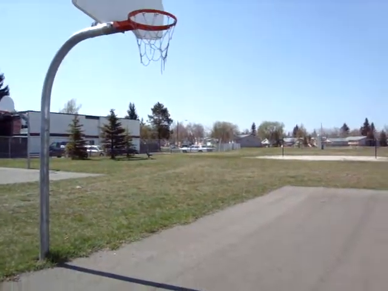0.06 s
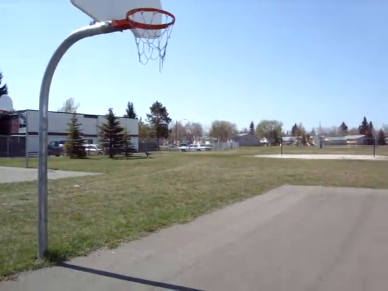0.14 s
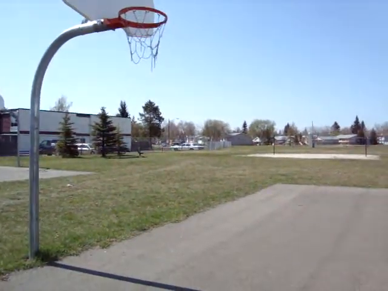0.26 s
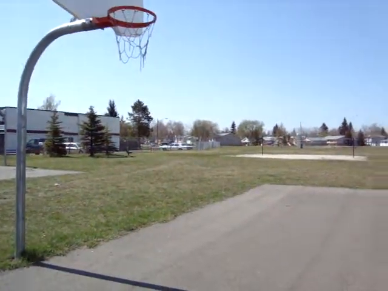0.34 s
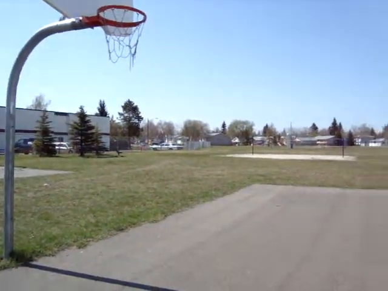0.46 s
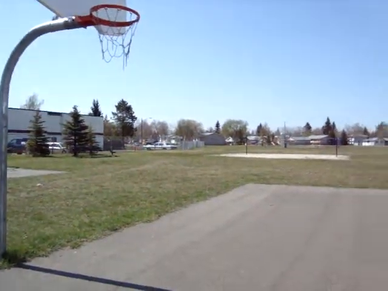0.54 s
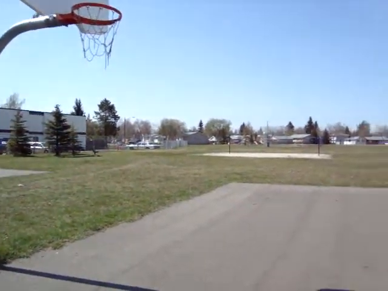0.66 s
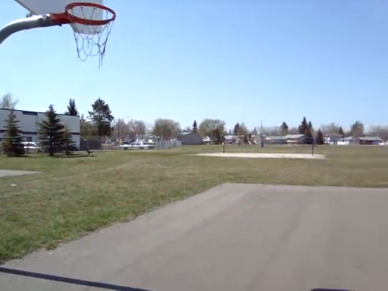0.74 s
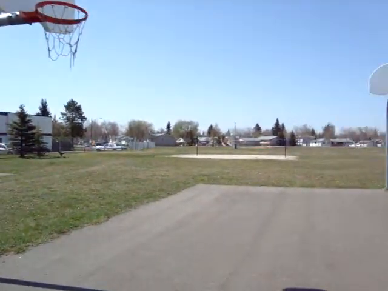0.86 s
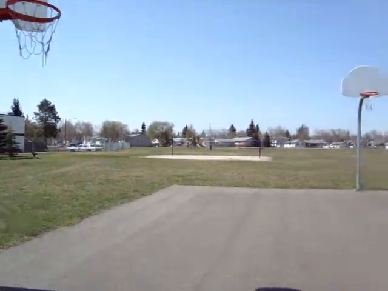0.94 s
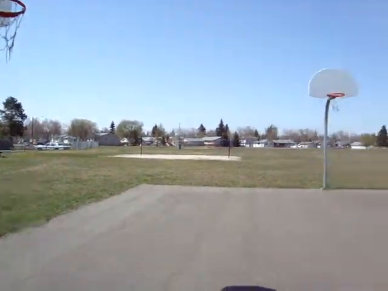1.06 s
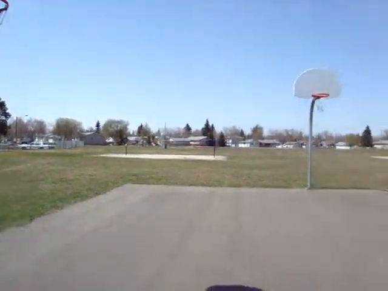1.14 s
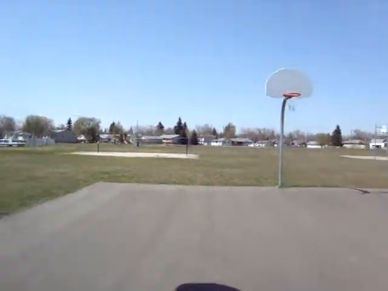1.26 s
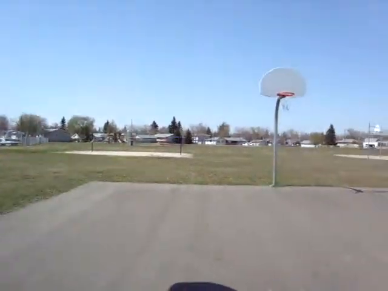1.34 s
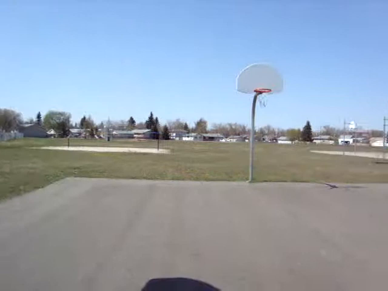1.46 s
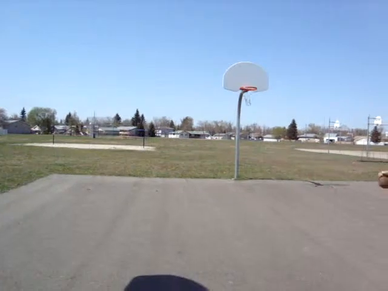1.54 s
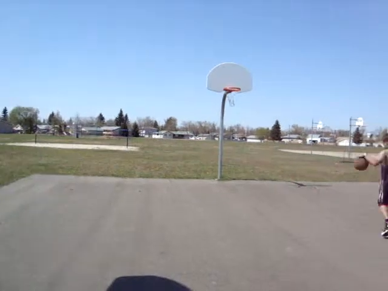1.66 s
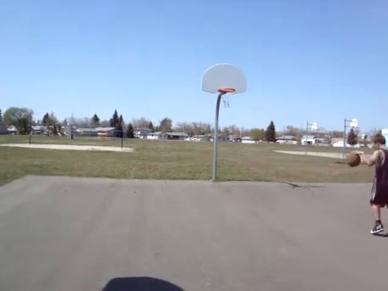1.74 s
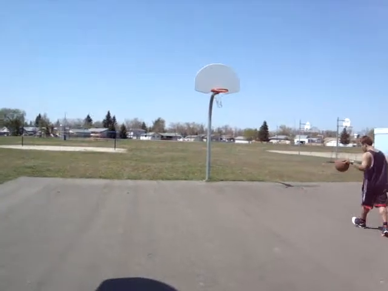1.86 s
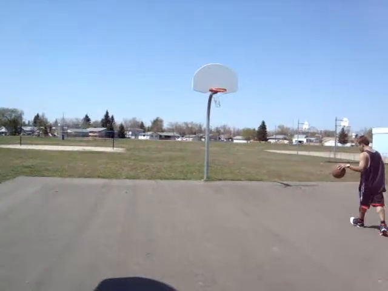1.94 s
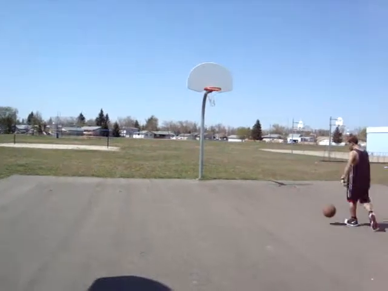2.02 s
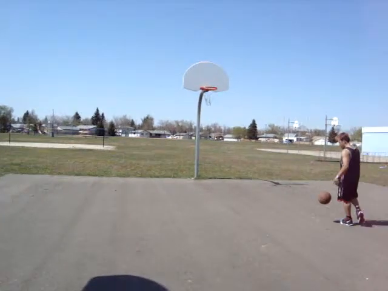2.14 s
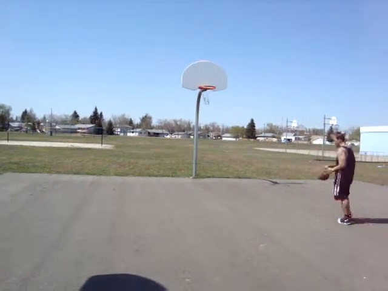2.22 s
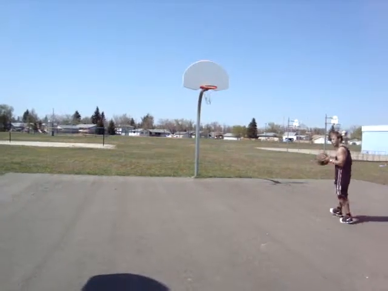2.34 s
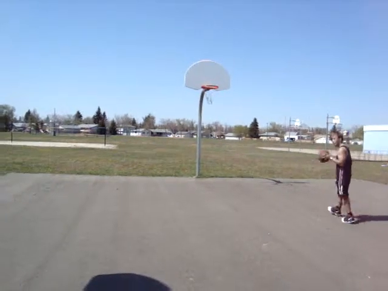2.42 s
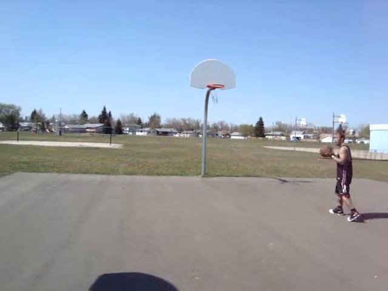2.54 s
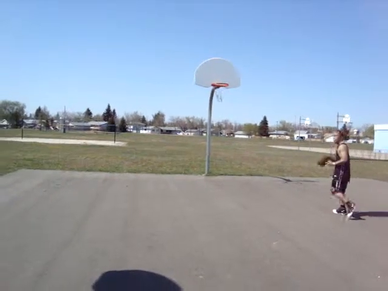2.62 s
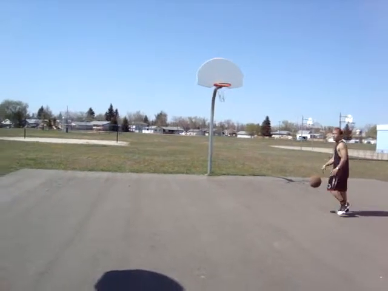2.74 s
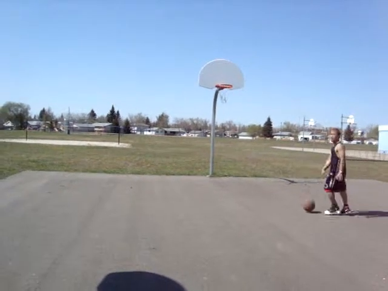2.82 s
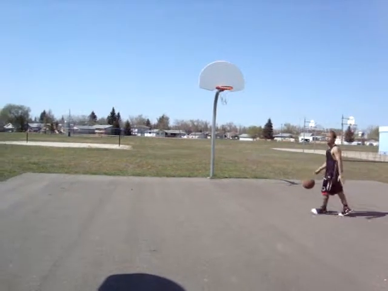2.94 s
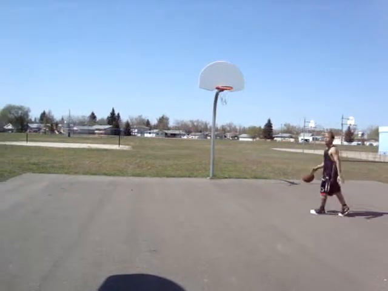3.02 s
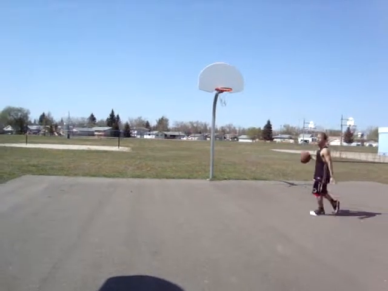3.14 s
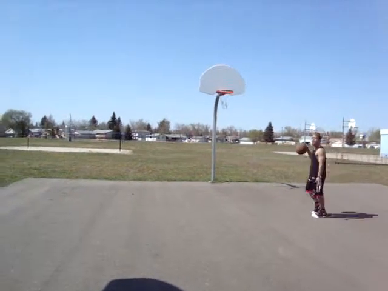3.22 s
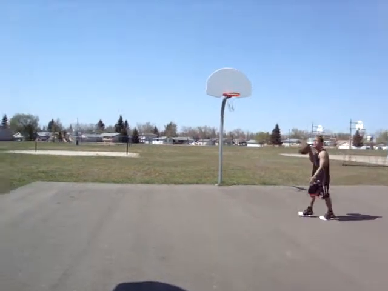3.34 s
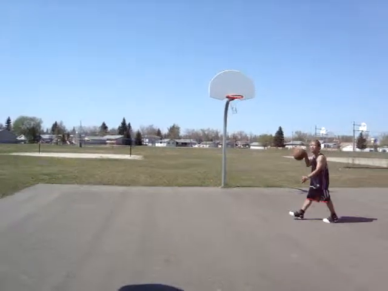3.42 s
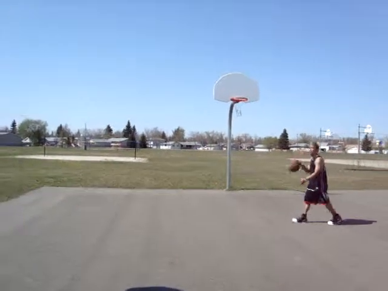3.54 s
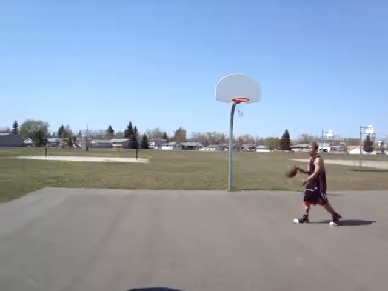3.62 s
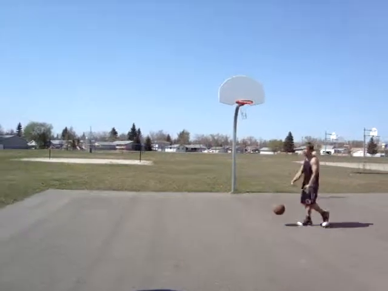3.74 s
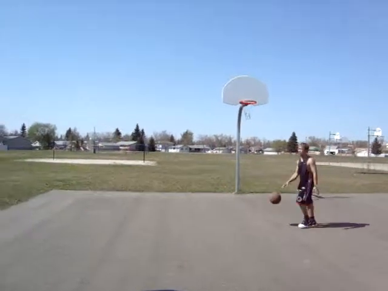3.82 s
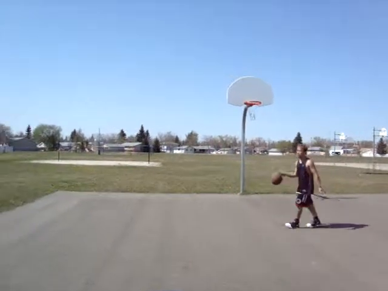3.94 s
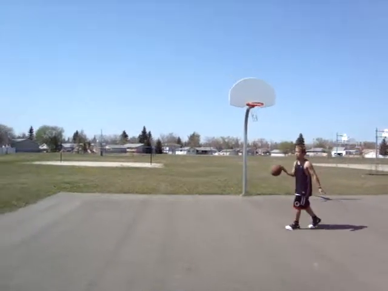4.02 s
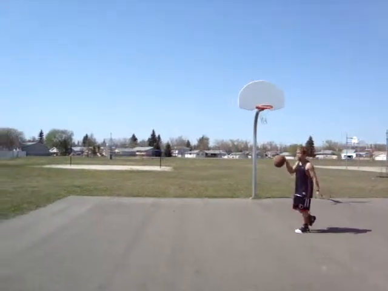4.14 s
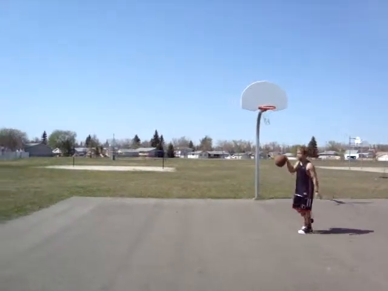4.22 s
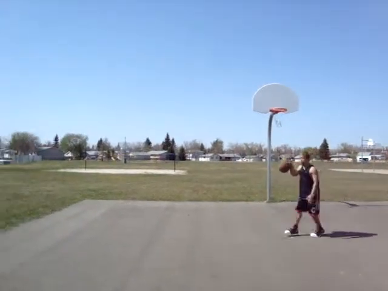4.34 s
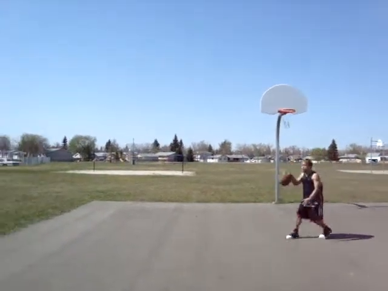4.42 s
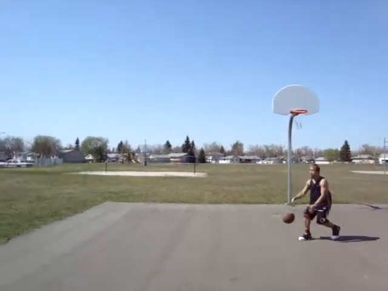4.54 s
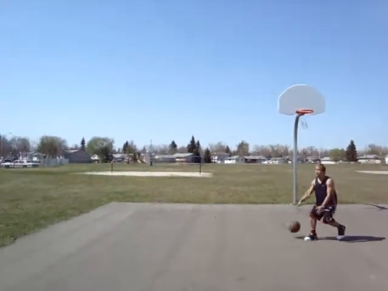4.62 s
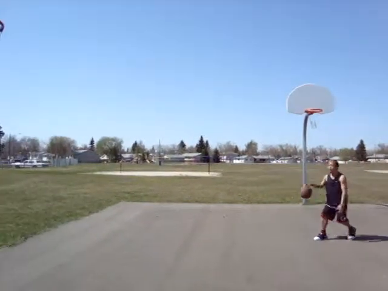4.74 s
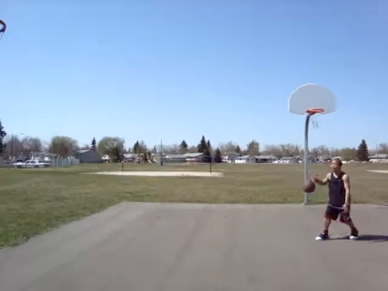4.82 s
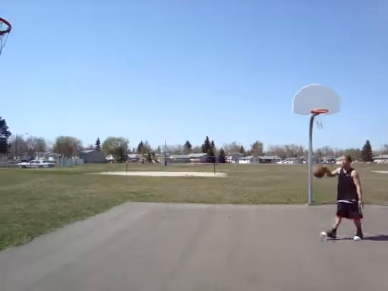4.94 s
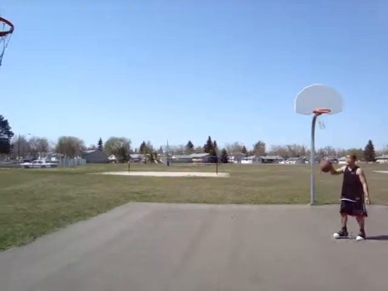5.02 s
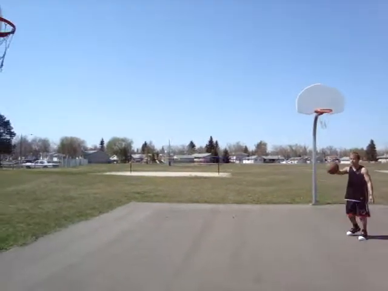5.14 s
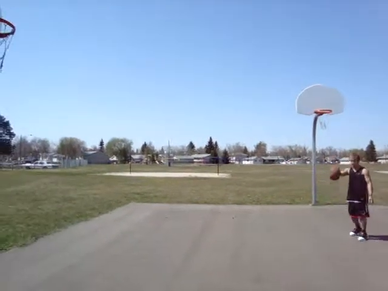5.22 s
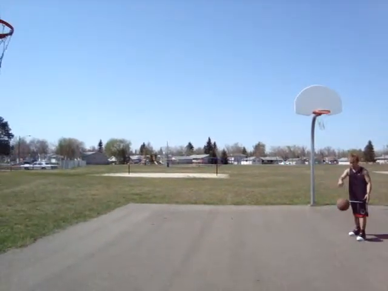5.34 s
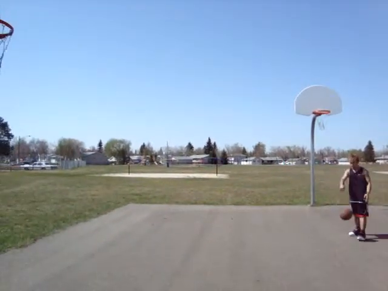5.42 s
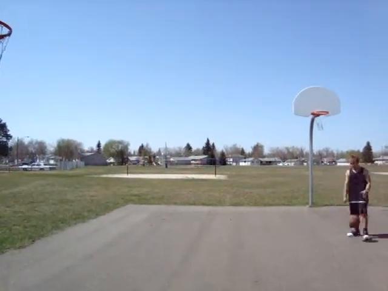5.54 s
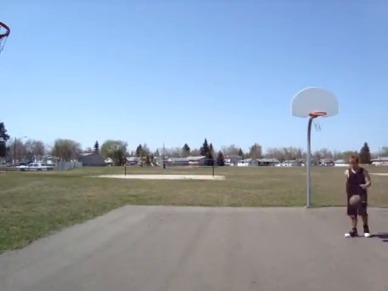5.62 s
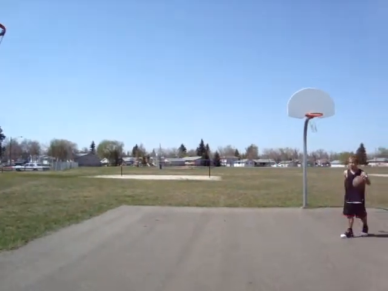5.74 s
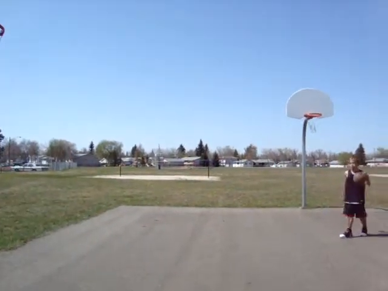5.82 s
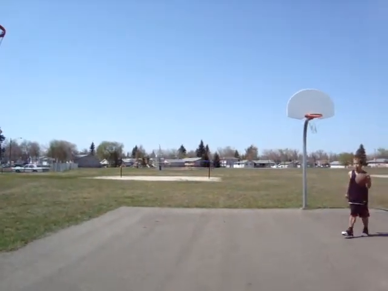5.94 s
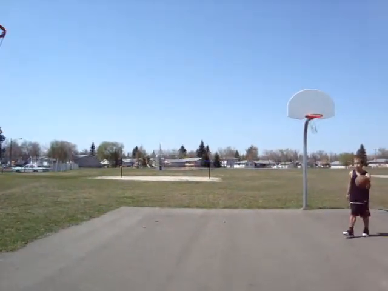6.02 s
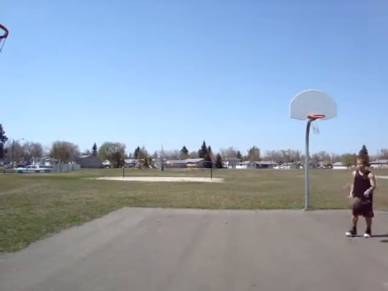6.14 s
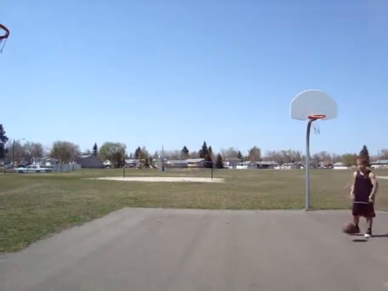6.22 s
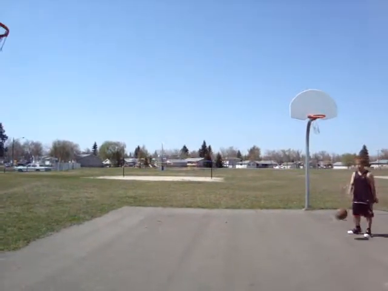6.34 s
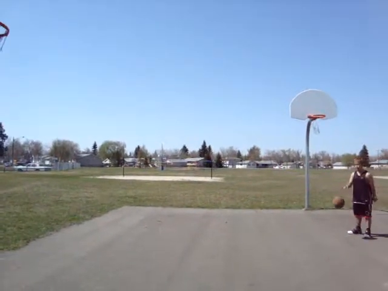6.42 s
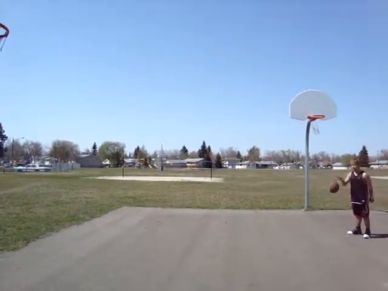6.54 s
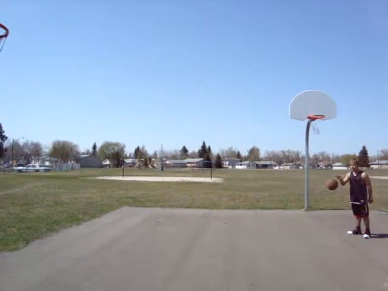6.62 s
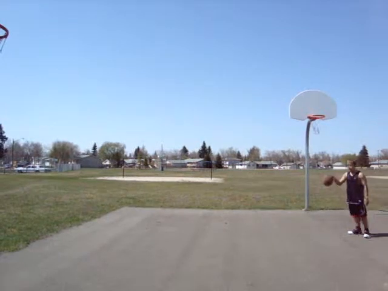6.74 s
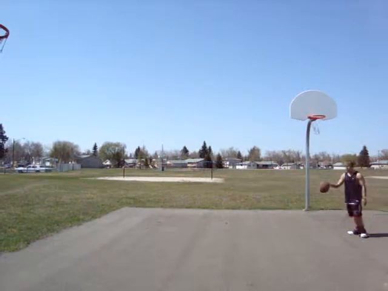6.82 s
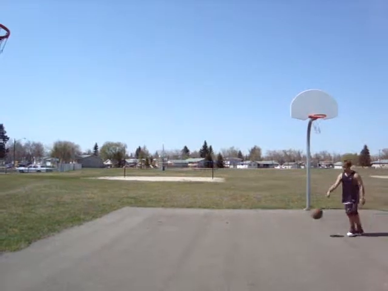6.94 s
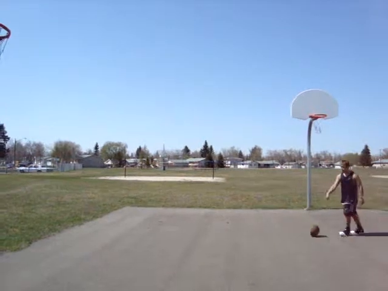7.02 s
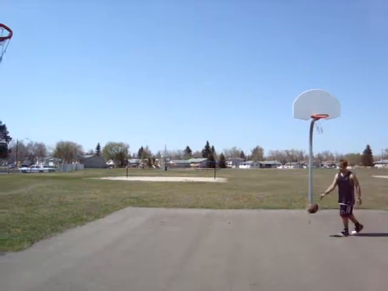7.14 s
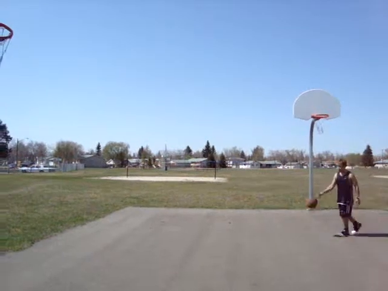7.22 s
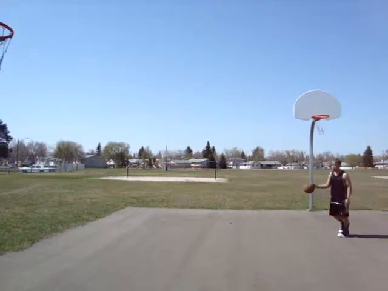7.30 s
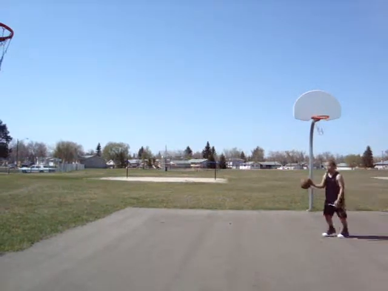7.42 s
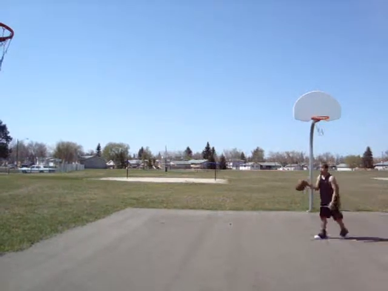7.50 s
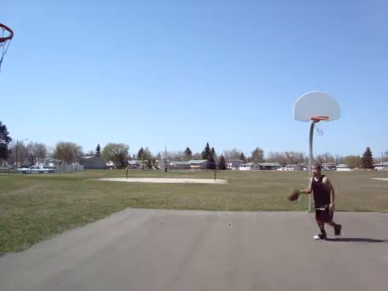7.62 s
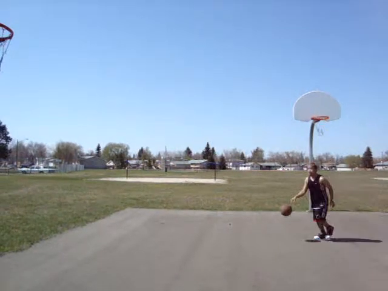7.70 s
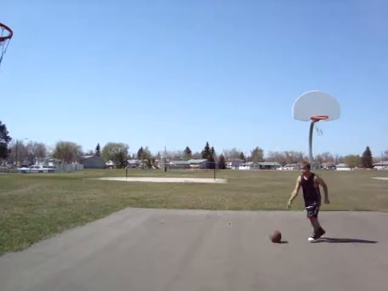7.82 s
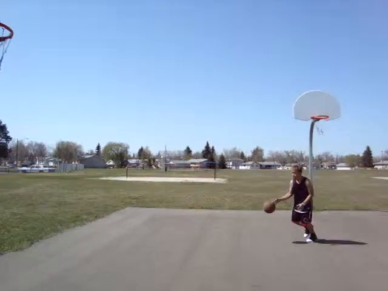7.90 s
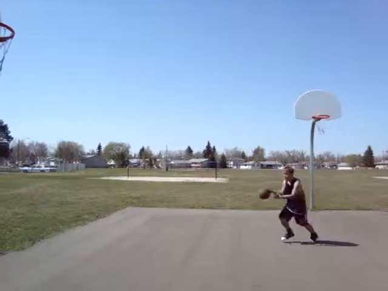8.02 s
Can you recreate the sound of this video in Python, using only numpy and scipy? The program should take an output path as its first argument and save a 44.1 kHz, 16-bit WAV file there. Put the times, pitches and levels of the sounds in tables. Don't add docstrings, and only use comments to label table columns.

```python
import sys
import numpy as np
from scipy import signal
from scipy.fft import rfft, irfft, next_fast_len
from scipy.io import wavfile
from scipy.ndimage import uniform_filter1d, map_coordinates

SR = 44100
rng = np.random.default_rng(int(sys.argv[2]) if len(sys.argv) > 2 else 0)


def volts_from_db(level):
    exponent = np.asarray(level, float) / 20
    return 10 ** exponent


def generate_wav(sig):
    pcm = np.round(np.clip(np.atleast_2d(sig).T, -1, 1) * 32767).astype(np.int16)
    wavfile.write(sys.argv[1], SR, pcm)


N = 355887


def unit(x):
    return x / np.sqrt(np.mean(x ** 2) + 1e-20)


def filtered(x, response):
    m = next_fast_len(len(x) + 4096)
    return irfft(rfft(x, m) * response(np.fft.rfftfreq(m, 1 / SR)), m)[:len(x)]


def noise(spectrum, size):
    f, db = np.transpose(spectrum)
    white = rng.standard_normal(size)
    return unit(filtered(white, lambda hz: volts_from_db(np.interp(np.log(hz + 1), np.log(f), db))))


def wobble(rate, size=N):
    knots = rng.standard_normal(int(size * rate / SR) + 4)
    return map_coordinates(knots, [np.arange(size) * rate / SR])


def add(track, s, sound):
    part = track[round(s * SR):][:len(sound)]
    part += sound[:len(part)]


def decay(t, t60):
    return volts_from_db(-60 * t / t60)


def sine(hz, t):
    return np.sin(2 * np.pi * hz * t)


def ring(modes, t, attack):
    tones = 0
    for hz, db, t60 in modes:
        strength, detune = rng.standard_normal(2)
        tones = tones + volts_from_db(db + 1.1 * strength) * decay(t, t60) * sine(hz * (1 + 0.032 * detune), t)
    return tones * (1 - np.exp(-t / attack))


# t/s, level/dB
WIND_STRENGTH = [(0, -59.5), (1.73, -59), (1.89, -47.5), (2.36, -52.5), (2.79, -56), (3.32, -55.5),
                 (3.84, -59.5), (4.83, -62), (5.19, -59), (5.64, -60.5), (7.46, -57.5), (7.87, -55),
                 (8.07, -57)]
# f/Hz, level/dB per Hz
WIND_RUMBLE = [(12, -69), (20, -35.5), (97, -6.5), (215, -3), (286, -13), (600, -13.5), (780, -38.5),
               (1320, -120)]


def wind():
    lumps = unit(noise(WIND_RUMBLE, N) * volts_from_db(4.0 * wobble(30)))
    return volts_from_db(np.interp(np.arange(N) / SR, *np.transpose(WIND_STRENGTH))) * lumps


# t/s, level/dB
ROAD_LEVEL = [(0, -48.5), (.43, -50.5), (1.89, -50), (2.07, -51.5), (3.84, -50.5), (4.83, -49.5),
              (5.64, -50.5), (6.43, -49), (8.07, -49)]
# f/Hz, level/dB per Hz
TRAFFIC_COLOUR = [(150, -39), (250, -6), (540, -8.5), (802, -2.5), (1320, -7), (2000, -13.5), (5000, -48.5),
                  (11000, -120)]


def traffic():
    z = signal.stft(noise(TRAFFIC_COLOUR, N), nperseg=512)[2]
    patches = uniform_filter1d(uniform_filter1d(rng.standard_normal(z.shape), 5, 0), 8, 1)
    hum = unit(signal.istft(z * volts_from_db(1.6 * unit(patches)), nperseg=512)[1][:N])
    return volts_from_db(np.interp(np.arange(N) / SR, *np.transpose(ROAD_LEVEL)) + 1.0) * hum


# f/Hz, level/dB per Hz
HISS_COLOUR = [(1470, -24.5), (2500, -2.5), (2680, -3), (2950, -4), (4340, -8), (9880, -13), (12800, -22.5),
               (21700, -120)]


def microphone():
    whine = np.sin(2 * np.pi * 7560 * np.arange(N) / SR + 3 * wobble(37))
    return volts_from_db(-58.5) * noise(HISS_COLOUR, N) + volts_from_db(-75.0) * whine


def tick(t, hz, ms, narrow):
    colour = [(hz / 3, -26), (hz / 2.1, -5), (hz, 0), (hz * 1.36, -4), (hz * 1.97, -13), (hz * 3.7, -26)]
    burst = noise(np.array(colour) * [1, narrow], len(t))
    burst *= np.exp(-t * 1000 / max(ms, .3)) * (1 - np.exp(-t / 0.00011))
    return burst / np.abs(burst).max()


# t/s, peak level/dB, centre f/Hz
GRIT_TICKS = [(0.014, -31, 2030), (0.5068, -33, 2300), (0.5133, -29.5, 2000), (0.5196, -26.5, 4530),
              (0.5706, -36.5, 2870), (1.0105, -32.5, 4600), (1.0538, -25.5, 4090), (1.62, -26.5, 1900),
              (1.936, -24.5, 3040), (1.955, -34, 2900), (1.974, -30, 3250), (2.299, -36.5, 1980),
              (4.089, -35, 2000), (4.5404, -34, 1890), (4.552, -38, 5040), (4.6188, -33.5, 2120),
              (4.619, -31.5, 4970), (5.175, -43, 2280), (6.719, -42, 1600), (7.611, -36.5, 3600),
              (7.614, -32, 2190), (7.626, -28, 2280), (7.721, -38.5, 1700), (8.034, -41, 1600),
              (8.059, -36, 1860)]


def grit_ticks():
    out, t = np.zeros(N), np.arange(SR // 10) / SR
    for s, db, hz in GRIT_TICKS:
        add(out, s, volts_from_db(db) * tick(t, hz, ms=1.6, narrow=0.97))
    return out


# f/Hz, level/dB
SMACK_COLOUR = [(200, -22), (800, -6), (1500, 1.5), (3000, -10), (5500, -9.5), (10000, -23)]


def crack(t, width_ms, snap_db, snap_hz, pull=1, rebound=0):
    u = t * 1000 / np.clip(width_ms, .05, .3) - 2
    swing = -1.65 * u * np.exp(-u * u / 2) * np.where(u > 0, pull, 1)
    v = u - 4.2
    again = np.exp(-v ** 2 / 2.5) - 0.55 * np.exp(-(v - 3) ** 2 / 8)
    snap = volts_from_db(snap_db) * sine(snap_hz, t) * decay(t, 0.0042) * (1 - np.exp(-t / .00012))
    smack = noise(SMACK_COLOUR, len(t)) * decay(t, .008)
    return swing + rebound * again + snap + 0.22 * smack


def lift(t, hz, low_db):
    tones = ring([(hz, 0, .012), (1.3 * hz, -7, .01), (2.4 * hz, -17, .005)], t, 0.0016)
    smack = noise(SMACK_COLOUR, len(t)) * decay(t, .015) * (1 - np.exp(-t / .0007))
    return tones + 0.069 * smack + volts_from_db(low_db) * ring([(429.0, 0.015, 0.088)], t, 0.0008)


# f/Hz, t60/s
CAVITY_MODES = [(2170, 8.1), (2868, 4.1), (3512, 1.4), (4428, 1.6)]
BEAM_ANGLES = [.3, 0.065, 0.74, .8]


def ping(t, levels, caught, facing):
    tones = 0
    for angle, db, (hz, t60) in zip(BEAM_ANGLES, levels, CAVITY_MODES):
        turns = 9.6 * t + facing + angle
        beam = (1 + .5 * np.cos(2 * np.pi * turns)) / 1.13
        tones = tones + beam * volts_from_db(db + 0.8 * wobble(17, len(t))) * decay(t, t60) * sine(hz, t)
    held = (1 - np.exp(-t / .04)) / (1 + np.exp((t - caught) / 0.019))
    return held * tones


# t/s, crack level/dB, shell ring level/dB, thud level/dB, pitch over the usual shell pitch
TOUCHDOWNS = [(0.2243, -12.5, -7.5, -26, 1.03), (0.8264, -12, -11, -29, 1.24),
              (1.4747, -14, -22.5, -36.5, 1), (2.1717, -12.5, -15, -34.5, 1.42),
              (2.9385, -12.5, -15, -35, 1.07), (3.8556, -12, -13, -31, 1.1),
              (4.693, -12.5, -24, -34.5, 0.98), (5.5575, -14, -22.5, -39, .92),
              (6.3504, -13, -10.5, -37, 1.18), (7.1287, -13, -23, -34, 1.24),
              (7.8824, -11.5, -16.5, -34.5, 1.1)]
# t/s, ring level/dB, f/Hz
LIFTOFFS = [(0.2345, -11, 1076), (0.8372, -10, 1030), (1.4855, -20, 1014), (2.1822, -10.5, 980),
            (2.9489, -21.5, 1370), (3.864, -13.5, 1006), (4.704, -16, 1050), (5.5685, -13, 930),
            (6.3611, -14, 1044), (7.139, -22, 1010), (7.893, -17, 1030)]
# push and pull width/ms, snap level/dB, snap f/Hz, scatter level/dB, side facing us/turns
CONTACTS = [(0.069, -2.5, 3500, -30, .9), (.085, -0.5, 4600, -29.5, .8), (.07, -2.5, 4900, -33, 0.34),
            (0.08, -10.5, 5000, -33, .9), (.08, -1, 3700, -37.5, .8), (0.088, -14, 4000, -33, .9),
            (0.098, -13, 3300, -34.5, 0.55), (0.068, -5, 4500, -36, 0.55), (0.11, -21, 3300, -32.5, .8),
            (0.07, -5.5, 3000, -35, 0.63), (0.085, -14.5, 5500, -36.5, 0.68)]
AIR_SWINGS = [(1.4, .9), (1.9, 1.04), (1, 0.012), (1, .5), (0.89, 0.27), (0.76, .1), (0.46, 0),
              (0.46, 0.072), (0.95, 0.24), (.45, 0.084), (.5, 0.035)]
# level/dB of four modes, hand damps it after t/s
CAVITY_PINGS = [(-67, -55.5, -56.5, -61, 0.4), (-60, -54, -59, -82, 0.29), (-57.5, -55, -74, -57, 0.34),
                (-54.5, -56, -63, -60.5, 0.19), (-58.5, -64.5, -73, -77, 0.32),
                (-57.5, -52, -66, -84, 0.43), (-58.5, -68, -85, -63, 0.25), (-61.5, -71, -57.5, -69, 0.5),
                (-61, -64, -81, -83, 0.34), (-65, -74.5, -76, -76, 0.45), (-71, -71.5, -76, -80, 0.305)]
# f/Hz, level/dB, t60/s
SHELL_MODES = [(864, -1.5, .024), (1030, 1, 0.018), (1305, -2.5, 0.013), (1680, -7, 0.0083),
               (2110, -13.5, 0.0091), (2670, -20, .005), (3470, -23, 0.0028)]
# f/Hz, level/dB, t60/s
BODY_MODES = [(158, -4, 0.058), (280, 8, 0.035), (469.5, -5.5, 0.086)]
# f/Hz, level/dB
SCATTER_COLOUR = [(100, -14), (300, -7.5), (1000, 5.5), (2000, -4), (4000, -16), (5200, -21.5),
                  (9000, -30.5)]


def low_ring_db(thud_db, up_db):
    return thud_db - 5.5 - up_db


def bounces():
    out, t = np.zeros(N), np.arange(SR // 2) / SR
    rows = zip(TOUCHDOWNS, LIFTOFFS, CONTACTS, AIR_SWINGS, CAVITY_PINGS)
    for (s, crack_db, ring_db, thud_db, pitch), (up, up_db, up_hz), contact, swing, cavity in rows:
        *push, scatter_db, facing = contact
        *ping_levels, caught = cavity
        shell = np.array(SHELL_MODES) * [pitch, 1, 1]
        add(out, s + .0011, volts_from_db(crack_db + 2.5) * crack(t, *push, *swing))
        add(out, s + .00145, volts_from_db(ring_db + 1.0) * ring(shell, t, 0.00071))
        add(out, s + .00145, volts_from_db(thud_db + 8) * ring(BODY_MODES, t, 0.0044))
        add(out, s + 0.0015, ping(t, ping_levels, caught, facing))
        tail = decay(t, 0.15) + 0.3 * decay(t, 0.71)
        add(out, s + 0.001902, volts_from_db(scatter_db) * noise(SCATTER_COLOUR, len(t)) * tail)
        add(out, up, volts_from_db(up_db + 10.0) * lift(t, up_hz, low_ring_db(thud_db, up_db)))
    return out


ECHO_SNAP = -14.5, 4250
# t/s, crack level/dB, ring level/dB
SMALL_ECHOES = [(0.2454, -25, -27), (0.268, -36, -33), (0.2777, -22, -40), (.8473, -36, -24),
                (0.8637, -41, -36), (0.8772, -37, -46), (1.4776, -18, -25), (1.5245, -18, -43),
                (2.1914, -31, -38), (2.2179, -26.5, -42), (3.8584, -39, -22), (3.8611, -24.5, -27),
                (3.8682, -30, -28), (3.871, -24.5, -23), (4.6951, -29, -39), (4.7223, -31.5, -36),
                (5.5614, -15.5, -16.5), (5.5872, -36, -42), (6.3648, -34, -26.5), (7.135, -25.5, -37),
                (7.155, -31, -52), (7.8853, -25, -31), (7.938, -28, -22.5)]


def small_echoes():
    out, t = np.zeros(N), np.arange(SR // 20) / SR
    for s, crack_db, ring_db in SMALL_ECHOES:
        add(out, s, volts_from_db(crack_db) * crack(t, .08, *ECHO_SNAP))
        add(out, s, volts_from_db(ring_db) * ring(SHELL_MODES, t, .0007))
    return out


# t/s, crack level/dB, ring level/dB
WALL_ECHOES = [(0.2715, -26.5, -21.5), (0.8703, -23.5, -23), (1.5173, -28, -30), (2.214, -21.5, -34),
               (2.98, -24.5, -28), (3.9007, -20.5, -29), (4.7411, -24.5, -37.5), (5.6037, -21, -36.5),
               (6.3951, -29.5, -27), (7.1749, -22.5, -46), (7.932, -25.5, -37)]


def wall():
    out, t = np.zeros(N), np.arange(SR // 2) / SR
    for touchdown, (up, up_db, up_hz), echo in zip(TOUCHDOWNS, LIFTOFFS, WALL_ECHOES):
        s, _, ring_db, thud_db, pitch = touchdown
        back, back_crack_db, back_ring_db = echo
        shell = np.array(SHELL_MODES) * [pitch, 1, 1]
        add(out, back + 0.00099, volts_from_db(back_crack_db + 4.0) * crack(t, 0.1, *ECHO_SNAP))
        add(out, back + 0.00099, volts_from_db(back_ring_db + 4) * ring(shell, t, 0.00068))
        add(out, back + 0.00099, volts_from_db(-27) * ring(BODY_MODES, t, 0.0051))
        back_up_db = up_db + back_ring_db - ring_db + 10.5
        add(out, back + up - s, volts_from_db(back_up_db) * lift(t, up_hz, low_ring_db(thud_db, up_db)))
    return out


# t/s, smear level/dB, ring level/dB
FAR_ECHOES = [(0.359, -43, -50), (0.435, -41, -27), (0.445, -42.5, -31.5), (0.957, -37.5, -36),
              (1.602, -52, -36.5), (2.294, -66, -62), (3.054, -38, -54), (3.986, -58, -56),
              (4.058, -41.5, -50), (5.587, -42.5, -42), (5.686, -50.5, -49), (6.452, -46, -52),
              (7.967, -43.5, -57)]


def far_buildings():
    out, t = np.zeros(N), np.arange(SR // 2) / SR
    for s, db, ring_db in FAR_ECHOES:
        smear = (1 - np.exp(-t / 0.0032)) * decay(t, 0.11)
        add(out, s, volts_from_db(db) * noise(SCATTER_COLOUR, len(t)) * smear)
        add(out, s, volts_from_db(ring_db) * ring([(431, -5.0, 0.11), (1080, -5.0, 0.084)], t, 0.0039))
    return out


# start t/s, hold/s, level/dB, fine sand relative level/dB
SCUFF_STROKES = [(0.53, 0.044, -60, -10), (2.567, 0.057, -54, -4.5), (3.038, 0.021, -49, -10.5),
                 (4.044, 0.032, -51.5, -10), (4.508, 0.077, -58.5, -9.5), (5.293, 0.021, -47, -5),
                 (5.355, 0.076, -59.5, -2.5), (5.454, 0.026, -59, 2), (5.5, 0.01, -49.5, -3.5),
                 (5.774, 0.043, -49.5, -7), (6.42, 0.037, -49.5, -12.5), (7.604, 0.016, -49.5, -10.5)]
# f/Hz, level/dB
GRIT_COLOUR = [(700, -12), (1400, 1.5), (2050, 7), (3000, -0.5), (4300, -7), (5500, -8.5), (7500, -14.5),
               (10000, -20.5)]
# f/Hz, level/dB
SAND_COLOUR = [(2500, -29.5), (3800, 2), (4500, 1), (5200, -9), (7500, -15.5)]


def scuffs():
    now, drag, sand = np.arange(N) / SR, np.zeros(N), np.zeros(N)
    for s, hold, db, sand_db in SCUFF_STROKES:
        fade_db = 327.5 * np.clip(now - s - hold, 0, 1)
        stroke = np.clip((now - s) / .012, 0, 1) * volts_from_db(db - fade_db)
        drag += stroke
        sand += volts_from_db(sand_db) * stroke
    fine = unit(noise(SAND_COLOUR, N) * volts_from_db(3 * wobble(300)))
    coarse = unit(noise(GRIT_COLOUR, N) * volts_from_db(2.5 * wobble(300)))
    return sand * fine + drag * coarse


# t/s, peak level/dB, f/Hz
WIND_POPS = [(1.287, -38, 212), (1.334, -41, 297), (1.641, -34.5, 218), (1.713, -37, 231),
             (1.722, -35.5, 196), (1.816, -34.5, 207), (1.895, -36, 184), (1.935, -26, 402),
             (1.954, -32, 174), (1.965, -25, 266), (1.969, -25, 204), (1.979, -33.5, 209),
             (1.989, -21.5, 247), (2.026, -31, 207), (2.042, -34, 220), (2.059, -27.5, 177),
             (2.12, -35.5, 164), (2.132, -34.5, 184), (2.273, -30, 210), (2.379, -21.5, 350),
             (2.409, -20.5, 256), (2.416, -32.5, 220), (2.453, -32, 280), (2.704, -35, 237),
             (3.112, -28, 299), (3.151, -29, 251), (3.163, -35, 132), (3.429, -38.5, 168),
             (3.548, -37.5, 131), (5.185, -39.5, 145), (5.287, -34, 370)]


def wind_pops():
    out, t = np.zeros(N), np.arange(SR // 20) / SR
    for s, db, hz in WIND_POPS:
        add(out, s, volts_from_db(db - 3.0) * sine(hz, t) * np.exp(-(t * hz / 0.63 - 1) ** 2))
    return out


# t/s, peak level/dB, centre f/Hz
SAND_CRUMBS = [(1.62, -37, 6500), (1.752, -46, 6500), (1.766, -45.5, 6500), (3.692, -49, 6000),
               (3.7174, -46.5, 5000), (3.77, -47, 6000), (3.79, -48, 6300), (4.058, -51, 6300),
               (4.1, -49, 6300), (5.296, -40.5, 4000), (6.2822, -49, 4300), (6.476, -44, 2800),
               (6.572, -48, 6500), (6.588, -48, 6500), (6.7197, -45.5, 6500), (2.45, -46, 6300),
               (2.466, -47, 6300), (2.517, -45, 6300), (5.78, -45, 4000), (5.795, -43, 5000),
               (7.722, -46, 6500), (7.738, -47, 6300), (7.969, -38, 2600)]


def crumbs():
    out, t = np.zeros(N), np.arange(SR // 10) / SR
    for s, db, hz in SAND_CRUMBS:
        add(out, s, volts_from_db(db) * tick(t, hz, ms=2.2, narrow=2.1))
    return out


# t/s, peak level/dB
RASP_CATCHES = [
    (2.5696, -32.5),
    (2.5746, -29.5),
    (2.5795, -28),
    (2.5856, -36),
    (2.5878, -37),
    (2.5914, -36),
    (2.5983, -31),
    (2.6031, -22.5),
    (2.6118, -38),
]


def rasp():
    out, t = np.zeros(N), np.arange(SR // 10) / SR
    for s, db in RASP_CATCHES:
        pulse = np.exp(-(t * 1000 / .26 - 1.6) ** 2)
        tones = (sine(4600, t) + .3 * sine(2000, t)) * pulse
        add(out, s, volts_from_db(db) * (.3 * tick(t, 4600, ms=0.5, narrow=5.2) + tones))
    return out


# t/s, length/s, level/dB
CHIRPS = [
    (4.045, .03, -56),
    (4.128, .042, -58),
    (4.889, 0.022, -57.5),
    (4.915, 0.06, -62),
    (4.979, .038, -57.5),
]


def bird():
    out = np.zeros(N)
    for s, length, db in CHIRPS:
        u = np.arange(0, 1, 1 / (length * SR))
        hz = 3100 + 640 * np.sin(np.pi * u) ** 1.8 + 110 * wobble(300, len(u))
        swell = (0.25 + 1.4 * u) * np.sqrt(np.sin(np.pi * u))
        whistle = np.sin(2 * np.pi * np.cumsum(hz) / SR)
        add(out, s, volts_from_db(db + 5 * wobble(120, len(u))) * swell * whistle)
    return out + volts_from_db(-5) * np.roll(out, round(.007 * SR))


# t/s, level/dB
HEEL_STEPS = [
    (4.354, -44.5),
    (5.292, -40.5),
    (5.775, -42),
    (5.801, -37.5),
]


def heels():
    out, t = np.zeros(N), np.arange(SR // 10) / SR
    for s, db in HEEL_STEPS:
        add(out, s, volts_from_db(db) * ring([(319, -1.0, 0.11), (218, -1.8, 0.056)], t, 0.0026))
    return out


# t/s, peak level/dB
SOLE_SLAPS = [
    (4.492, -8),
]
# f/Hz, level/dB, t60/s
SOLE_MODES = [(310, -9, 0.052), (825, 4, 0.019), (930, 0, 0.018), (1950, -18, 0.021), (2440, -1, 0.01),
              (3600, -1.5, 0.007), (4600, -4, .006)]


def stomp():
    out, t = np.zeros(N), np.arange(SR // 10) / SR
    for s, db in SOLE_SLAPS:
        add(out, s + 0.0012, volts_from_db(db - 7) * (ring(SOLE_MODES, t, 0.0015) + 0.31 * crack(t, 0.046, -4, 5100)))
        add(out, s + 0.0013, volts_from_db(db - 24.5) * noise(SCATTER_COLOUR, len(t)) * decay(t, 0.041))
    return out


# multiple of the pitch, level/dB
HALF_PARTIALS = [(.5, -9), (1.5, -14)]


def squeak(length, from_hz, end_hz):
    t = np.arange(0, length, 1 / SR)
    settles_s = .068
    steady = 1 / (1 + np.exp((settles_s - t) / 0.002))
    climb = 1 - np.clip(1 - t / .046, 0, 1) ** 1.4
    glide = from_hz + (end_hz * (1 + .045 * (1 - steady)) - from_hz) * climb
    jitter = (0.0022 + 0.012 * (1 - steady)) * wobble(150, len(t))
    phase = 2 * np.pi * np.cumsum(glide * (1 + jitter)) / SR
    halves = sum(volts_from_db(db) * np.sin(multiple * phase) for multiple, db in HALF_PARTIALS)
    halves = volts_from_db(2 - 900 * np.clip(t - settles_s, 0, 1)) * halves
    tone = np.sin(phase) + volts_from_db(-21 + 9.0 * steady) * np.sin(2 * phase) + halves
    swell = np.clip(t / .018, 0, 1) ** 2 * np.clip((length - t) / 0.018, 0, 1)
    return volts_from_db(1.5 * steady + 2.4 * (1.0 - 1.1 * steady) * wobble(110, len(t))) * swell * tone


# start t/s, length/s, level/dB, start f/Hz, f/Hz it settles on if it lasts
RUBBER_SQUEAKS = [
    (4.518, 0.05, -48.5, 1324, 2016),
    (4.532, 0.036, -50, 1260, 1630),
    (4.551, 0.149, -45.5, 1329, 2058),
    (4.591, 0.054, -48, 1550, 1580),
    (5.331, .07, -59, 1950, 1875),
    (5.415, 0.048, -61, 1950, 1890),
    (5.484, .03, -53, 1960, 1930),
]


def squeaks():
    out = np.zeros(N)
    for s, length, db, from_hz, end_hz in RUBBER_SQUEAKS:
        add(out, s, volts_from_db(db) * squeak(length, from_hz, end_hz))
    return out


# start t/s, length/s, level/dB
SOLE_TWISTS = [
    (5.302, .035, -57.5),
    (5.37, .04, -60),
    (5.43, .08, -57.5),
]
# f/Hz, width/Hz, level/dB
SINGING_BANDS = [(2000, 110, 1), (2620, 120, -5.5), (3400, 110, -5), (4460, 300, -6)]


def twists():
    out, t = np.zeros(N), np.arange(SR // 10) / SR

    def bands(f):
        return sum(volts_from_db(db) / np.hypot(1, (2 * (f - hz) / width) ** 2) for hz, width, db in SINGING_BANDS)

    for s, length, db in SOLE_TWISTS:
        swell = np.abs(np.sin(np.pi * np.clip(t / length, 0, 1)))
        add(out, s, volts_from_db(db) * unit(filtered(rng.standard_normal(len(t)), bands)) * swell)
    return out


def scene():
    background = wind() + traffic() + microphone() + wind_pops()
    dribble = bounces() + small_echoes() + wall() + far_buildings()
    shoes = grit_ticks() + scuffs() + crumbs() + rasp() + heels() + stomp() + squeaks() + twists()
    return (background + dribble + shoes + bird())[None]


# f/Hz, level/dB
STEP_SHAPE = [(0, -3), (1100, -4), (1500, 1), (5500, 2.5), (7500, -4.5), (10000, -5.5)]


def starve(x, step_db, slope, quiet_db):
    hop, lead = 96, 592
    n, k = np.arange(2 * hop), np.arange(hop)
    hz = k * 16000 / hop
    window = np.sin(np.pi * (n + .5) / (2 * hop))
    basis = window * np.cos(np.pi / hop * np.outer(k + .5, n + .5 + hop / 2)) * np.sqrt(2 / hop)
    low = signal.resample_poly(x, 320, 441)
    fill = -(len(low) + lead) % (12 * hop) + 13 * hop
    halves = np.pad(low, (lead, fill)).reshape(-1, hop)
    c = (np.hstack([halves[:-1], halves[1:]]) @ basis.T).reshape(-1, 12, hop)

    treble_db = 10 * np.log10(np.mean(c[:, :, 16:60] ** 2, axis=2) + 1e-12)
    top_db, calm_db = treble_db.max(axis=1), treble_db.min(axis=1)
    blow = top_db - calm_db > 9
    calm_step_db = calm_db + quiet_db + 3 * rng.standard_normal(len(c))
    frame_db = np.where(blow, step_db + slope * (top_db + 41), calm_step_db)
    thin_db = 8.5 * np.exp(-((hz - 6200) / 1400) ** 2)
    band_db = np.repeat(2.5 * rng.standard_normal((len(c), 1, 24)), 4, axis=2)
    band_db = band_db + np.interp(hz, *np.transpose(STEP_SHAPE))
    step = volts_from_db(frame_db[:, None, None] + band_db + ~blow[:, None, None] * thin_db)
    c = np.sign(c) * np.floor((np.abs(c) / step) ** .75 + .4054) ** (4 / 3) * step

    blocks = c.reshape(-1, hop) @ basis
    first = np.pad(blocks[:, :hop], ((0, 1), (0, 0)))
    second = np.pad(blocks[:, hop:], ((1, 0), (0, 0)))
    return signal.resample_poly((first + second).ravel()[lead:], 441, 320)[:N]


def band_limit(x):
    return signal.sosfilt(signal.butter(12, 10030, fs=SR, output="sos"), x)


def record(dry):
    rough = starve(dry[0], step_db=-45.5, slope=.8, quiet_db=-9.5)

    def band(hz):
        return np.clip((10050 - hz) / 120 + .5, .003, 1) * hz / np.hypot(hz, 45)

    mix = filtered(rough, band)[None]
    return band_limit(mix)


dry = scene()
out = record(dry)
generate_wav(out)
```